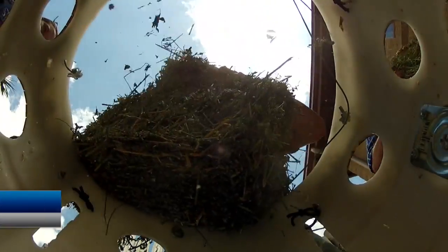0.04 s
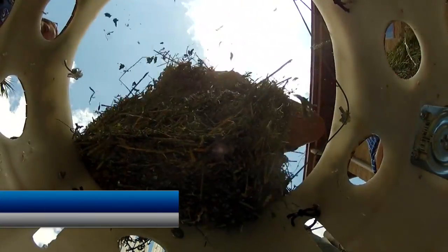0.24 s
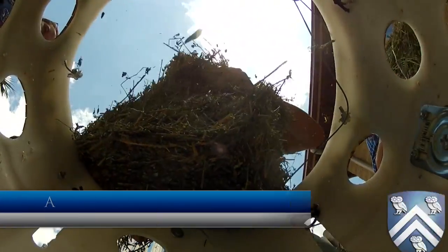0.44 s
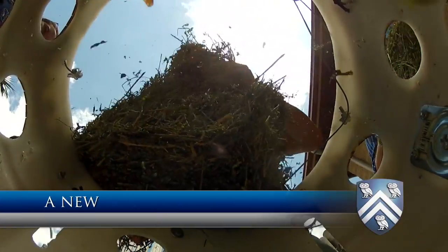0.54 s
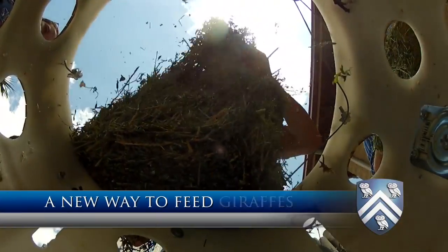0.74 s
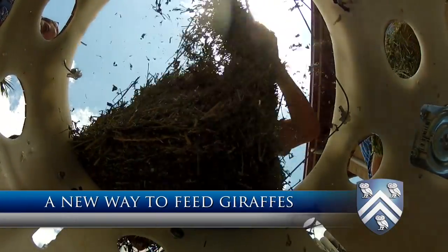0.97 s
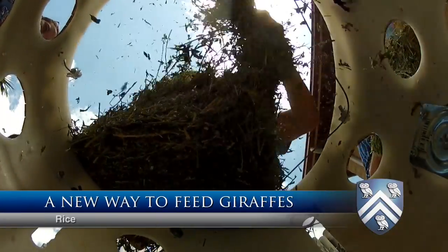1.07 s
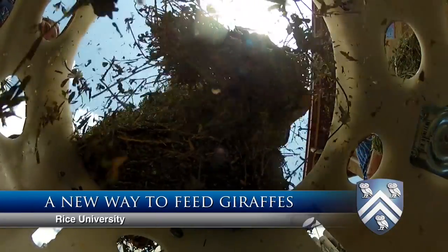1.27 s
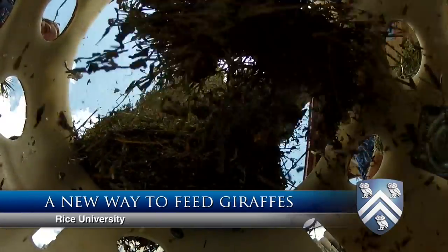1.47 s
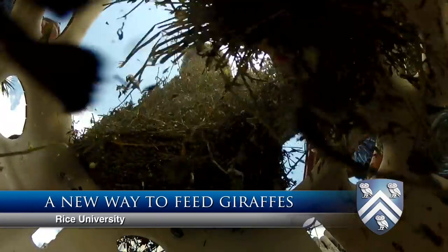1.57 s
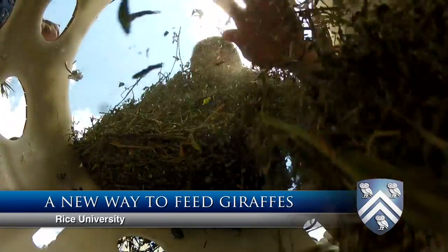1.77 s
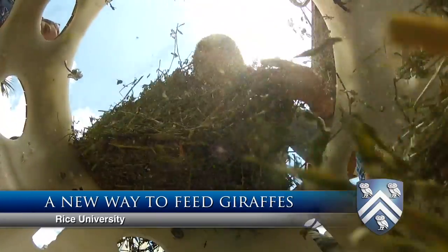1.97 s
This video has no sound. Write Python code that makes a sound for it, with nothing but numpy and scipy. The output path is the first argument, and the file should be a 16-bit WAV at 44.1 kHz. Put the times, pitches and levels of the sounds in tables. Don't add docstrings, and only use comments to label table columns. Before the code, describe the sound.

Dry hay pushed into a hollow plastic feeder, very close. Loud crackling, snapping and dragging at 0-0.15 s, fading through soft thumps near 0.27-0.35. A tiny squeak at 0.54, then a hard, short, hollow knock with a quick rebound at 0.63. Near quiet until 1.05; ticks and thumps, a stronger crackle around 1.27-1.32, faint rustle at 1.5, last snaps 1.86-2.0. Low outdoor rumble throughout, faint early hum, gritty treble.

```python
import sys
import numpy as np
from scipy import signal
from scipy.fft import rfft, irfft, next_fast_len
from scipy.io import wavfile
from scipy.ndimage import map_coordinates

SR = 44100
rng = np.random.default_rng(int(sys.argv[2]) if len(sys.argv) > 2 else 0)


def undo_db(level):
    steps = np.asarray(level, float) / 20
    return 10 ** steps


def waveform_to_disk(signal):
    frames = np.transpose(np.atleast_2d(signal))
    scaled = np.clip(frames, -1, 1) * 32767
    samples = np.round(scaled).astype(np.int16)
    wavfile.write(sys.argv[1], SR, samples)


N = 88993

# (frequency [Hz], level [dB], decay T60 [s])
PIPE_MODES = [(322, -4.5, 0.017), (387, 4, .025), (498, -2.5, 0.027), (642, -3, 0.025)]


def unit(x):
    return x / np.sqrt(np.mean(x ** 2) + 1e-20)


def along(points, hz):
    f, db = np.transpose(points)
    return np.interp(np.log(hz + 1), np.log(f + 1), db)


def wobble(rate):
    knots = rng.standard_normal(int(N * rate / SR) + 4)
    return map_coordinates(knots, [np.arange(N) * rate / SR])


def filtered(x, response):
    m = next_fast_len(N + 8192)
    gain = response(np.fft.rfftfreq(m, 1 / SR))
    return irfft(rfft(x, m) * gain, m)[:N]


def coloured(x, spectrum):
    return unit(filtered(x, lambda hz: undo_db(along(spectrum, hz))))


def grains(per_s, spread_db, decay_ms):
    chance, size = rng.random(N), rng.exponential(size=N)
    hits = (chance < per_s / SR) * undo_db(spread_db * np.minimum(size, 3.2))
    envelope = signal.lfilter([1], [1, -np.exp(-1000 / (decay_ms * SR))], hits)
    return unit(envelope * rng.standard_normal(N))


def ring(t, hz, t60):
    return np.sin(2 * np.pi * hz * t) * undo_db(-60 * t / t60)


def add(out, s, x):
    i = round(s * SR)
    out[i:i + len(x)] += x[:len(out) - i]


def hay():
    # (time [s], stalk crackle [dB], drag on the wall [dB])
    pushes = [(0, -27, -29), (0.142, -37, -36.5), (0.167, -55.5, -46.5), (0.232, -41, -37),
              (0.449, -45.5, -39), (.475, -60.5, -51.5), (.61, -62, -44.5), (.72, -50, -44.5),
              (1.052, -53, -44), (1.092, -44, -44), (1.273, -35.5, -33.5), (1.299, -47.5, -44.5),
              (1.52, -45, -42), (1.543, -62.5, -60), (1.68, -63.5, -46.5), (1.703, -54.5, -43.5),
              (1.86, -44, -38), (2.02, -38.5, -42.5)]
    # (frequency [Hz], level [dB per Hz])
    stalk_colour = [(410, -59), (700, -1.5), (867, -12.5), (931, -8.5), (1010, -10), (1450, -16.5),
                    (2290, -10.5), (4890, -18.5), (5900, -20), (7670, -58), (13000, -120)]
    # (frequency [Hz], level [dB per Hz])
    wall_colour = [(88, -44), (150, -8.5), (221, -5), (347, 0), (382, -1), (661, -5), (1500, -38),
                   (1950, -8), (3300, -120)]
    # (frequency [Hz], level [dB per Hz])
    shake_colour = [(20, -8), (60, 0.5), (120, -2), (220, -28), (400, -66)]
    stalk_hz, stalk_width_hz, stalk_db = 2080, 250, 2.5
    t = np.arange(N) / SR
    s, crackle_db, drag_db = np.transpose(pushes)

    stalks = grains(3600, 5.5, 0.28)
    fine = stalks + undo_db(1) * rng.standard_normal(N)
    clumps_db = 1 * wobble(59.29) + 0.77 * wobble(13.03)

    def stalk_peak(hz):
        return undo_db(stalk_db / (1 + ((hz - stalk_hz) / stalk_width_hz) ** 2))

    fine = filtered(fine * undo_db(clumps_db), stalk_peak)
    crackle = coloured(fine, stalk_colour) * undo_db(np.interp(t, s, crackle_db))
    scrapes = grains(620, 0.8, 2.6)
    drag = coloured(scrapes * undo_db(clumps_db), wall_colour)
    shake = undo_db(-6) * coloured(rng.standard_normal(N), shake_colour)
    return crackle + (drag + shake) * undo_db(np.interp(t, s, drag_db))


def soft_push(t):
    out = 0
    for hz, db, t60 in PIPE_MODES:
        mode_hz = hz * rng.normal(1, 0.06) * 1.153
        mode_db = db + rng.normal(0, 3)
        out = out + undo_db(mode_db) * ring(t, mode_hz, t60 * 0.88)
    return out * (1 - np.exp(-t / 0.0015)) ** 2


def snap(t, hz, ring_share):
    rise_s, burst_t60 = 0.00052, 0.0093
    band = signal.butter(2, [1100 / SR * 2, 5000 / SR * 2], "bandpass")
    burst = (1 - np.exp(-t / rise_s)) * undo_db(-60 * t / burst_t60) * rng.standard_normal(len(t))
    burst[round(rise_s * SR / 2)] -= 3.9
    crack = signal.lfilter(*band, burst)
    rung = np.convolve(burst, ring(t[:300], hz, 0.005))[:len(t)]
    both = unit(crack) + ring_share * unit(rung)
    return both / np.abs(both).max()


def snaps():
    # (time [s], peak [dB], pitch [Hz], share of ring [ratio], wall thump [dB])
    stalk_breaks = [(.0036, -9.5, 3540, 1.1, -12), (.0145, -15, 2920, .3, -13),
                    (.0275, -10.5, 2250, 0.95, -21), (.0402, -8, 2600, 1.8, -7),
                    (.0665, -16, 1970, 1.4, -9), (0.073, -27, 2600, 0.25, -14),
                    (.0805, -17, 2030, 3.1, -17), (0.0899, -15.5, 2030, 4, -15),
                    (.1055, -27, 2500, 0.22, -18), (0.1346, -20, 2800, .3, -12),
                    (0.1387, -19, 5200, 0.42, -19), (1.8655, -27.5, 3940, 2.5, -30),
                    (.1752, -21.5, 2960, 2.9, -40), (0.1953, -30.5, 3780, 3.3, -30),
                    (1.2657, -23.5, 3550, 3, -20), (1.2708, -27.5, 2010, 1.4, -12),
                    (1.2833, -26, 2210, 1, -23), (1.2918, -25, 3300, .4, -16),
                    (1.3096, -18.5, 3260, 0.33, -32), (1.3205, -8.5, 3740, .4, -40),
                    (1.8716, -22.5, 3860, 3.6, -29), (1.8749, -20.5, 2030, 2.2, -19),
                    (1.9054, -29, 4800, 2.7, -20), (1.9224, -23.5, 2050, 1.2, 0)]
    # (time [s], peak [dB])
    twig_ticks = [
        (0.1553, -23),
        (1.059, -47),
        (1.123, -28),
        (1.158, -29),
        (1.2745, -34.5),
        (1.342, -36),
        (1.547, -38.5),
        (1.896, -25),
        (1.912, -28),
        (1.989, -28),
    ]
    out, t = np.zeros(N), np.arange(2200) / SR
    twigs = [(s, db, 2300, 0.5, -30) for s, db in twig_ticks]
    for s, db, hz, ring_share, thump_db in [*stalk_breaks, *twigs]:
        broken = snap(t, hz, ring_share)
        add(out, s, undo_db(db) * (broken + undo_db(thump_db + 2.8) * soft_push(t)))
    return out


def thumps():
    # (time [s], level [dB])
    landings = [
        (.266, -19),
        (.325, -27),
        (.352, -35),
        (1.128, -28.5),
        (1.208, -33),
        (1.245, -31),
        (1.257, -37),
        (1.38, -31),
        (1.95, -28),
    ]
    out, t = np.zeros(N), np.arange(2200) / SR
    for s, db in landings:
        add(out, s, undo_db(db) * soft_push(t))
    return out


def knock():
    # (time [s], level [dB], contact [s])
    blows = [
        (.6266, -1, .0005),
        (.6378, -11, .0018),
    ]
    out, t = np.zeros(N), np.arange(4400) / SR
    band = signal.butter(2, [1500 / SR * 2, 4300 / SR * 2], "bandpass")
    dust = signal.lfilter(*band, rng.standard_normal(len(t)))
    tick = ring(t, 2750, 0.014) + 1.35 * undo_db(-60 * t / 0.017) * dust
    add(out, 0.6247, undo_db(-21) * tick)
    modes = sum(undo_db(db) * ring(t, hz, t60) for hz, db, t60 in PIPE_MODES)
    for s, db, contact_s in blows:
        add(out, s, -undo_db(db - 5.5) * modes * (1 - np.exp(-t / contact_s)) ** 2)
    wall_low_hz = 235
    return signal.lfilter(*signal.butter(3, wall_low_hz / SR * 2, "high"), out)


def squeak():
    start_s, long_s, hz = 0.537, 0.036, 940
    t = np.arange(N) / SR
    rub = coloured(rng.standard_normal(N), [(hz * 0.71, -40), (hz, 0), (hz * 1.8, -40), (SR, -120)])
    return undo_db(-49) * rub * np.sin(np.pi * np.clip((t - start_s) / long_s, 0, 1))


def hollow():
    # (frequency [Hz], level [dB per Hz])
    boom_colour = [(12, -59), (20, -10), (141, -9), (181, -8.5), (227, -6.5), (321, -15), (410, -13),
                   (464, -19.5), (1300, -62), (1690, -99), (2860, -120)]
    boom = coloured(rng.standard_normal(N), boom_colour)
    return boom * undo_db(-37.5 + 1.5 * wobble(8.07))


def far_hum():
    t = np.arange(N) / SR
    on = (t > 0.15) & (t < 0.54)
    return on * undo_db(-59.5 + 2.0 * wobble(24)) * np.sin(2 * np.pi * 935 * t)


def scene():
    near = hay() + snaps() + thumps() + knock() + squeak()
    return (near + hollow() + far_hum())[None]


def low_pass(x):
    return signal.sosfilt(signal.butter(12, 16510, fs=SR, output="sos"), x)


def record(dry):
    hold_hz, mirror_db = 12000, 0.5
    top_hz, over_db, end_s = 15250, -40, 2.0178
    t = np.arange(N) / SR
    x = filtered(dry[0], lambda hz: 1 / np.sqrt(1 + (hz / 5300) ** 24))
    x = x * (1 + 2 * undo_db(mirror_db) * np.cos(2 * np.pi * hold_hz * t))
    x = filtered(x, lambda hz: np.sinc(hz / hold_hz) * np.where(hz < top_hz, 1, undo_db(over_db)))
    return low_pass((x * (t < end_s))[None])


dry = scene()
out = record(dry)
waveform_to_disk(out)
```